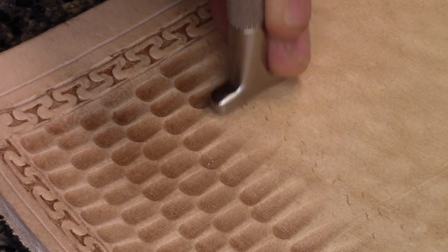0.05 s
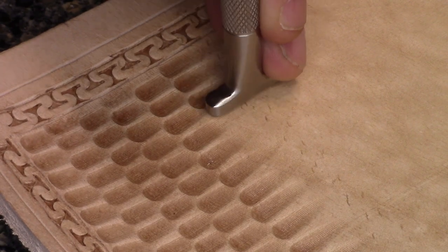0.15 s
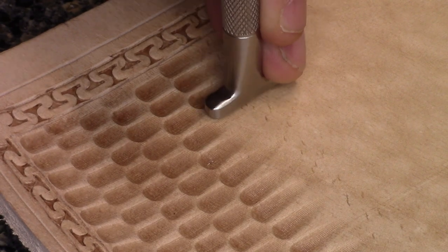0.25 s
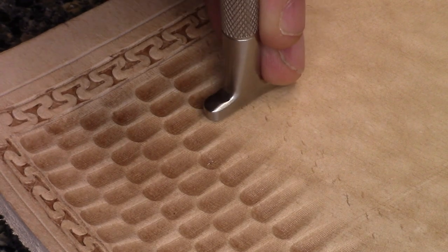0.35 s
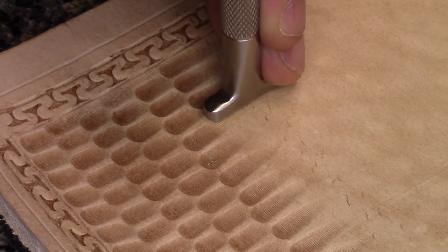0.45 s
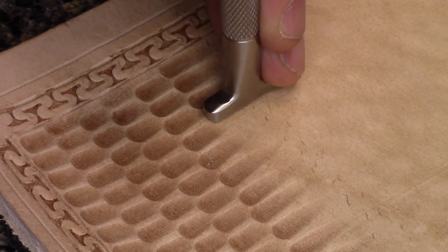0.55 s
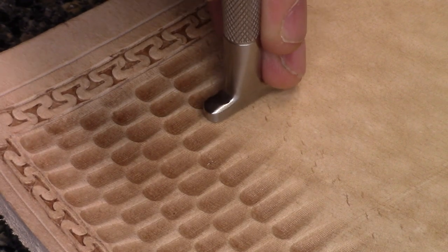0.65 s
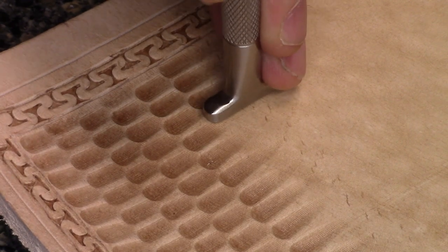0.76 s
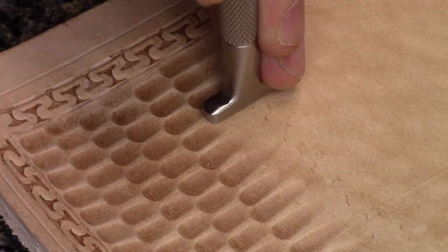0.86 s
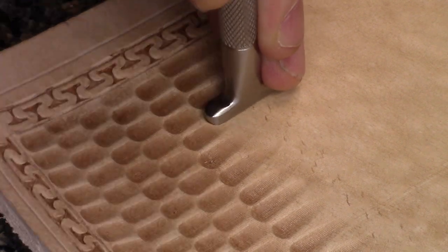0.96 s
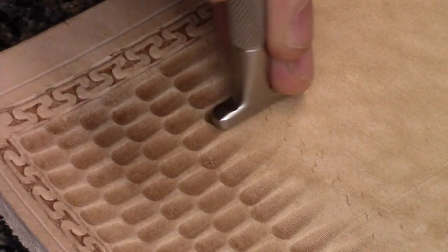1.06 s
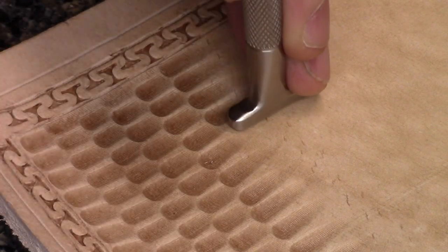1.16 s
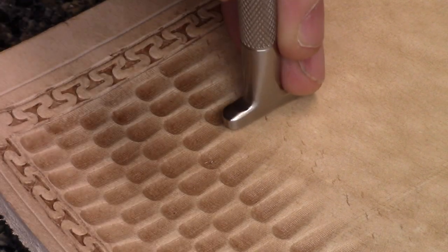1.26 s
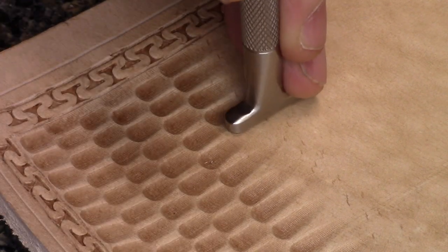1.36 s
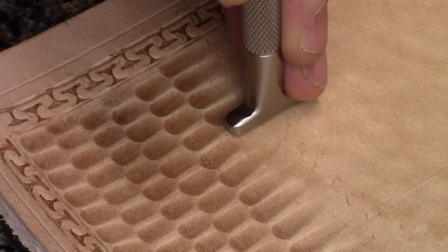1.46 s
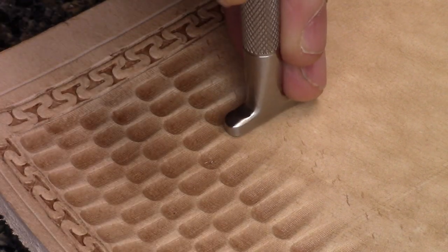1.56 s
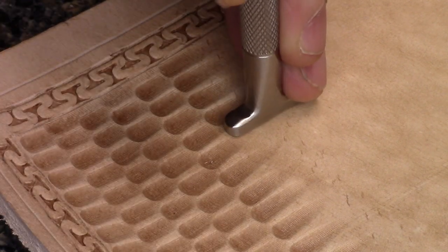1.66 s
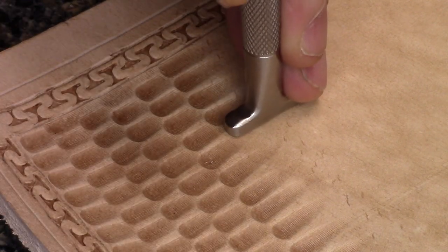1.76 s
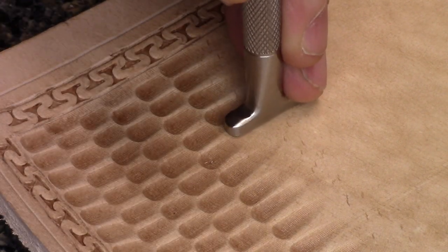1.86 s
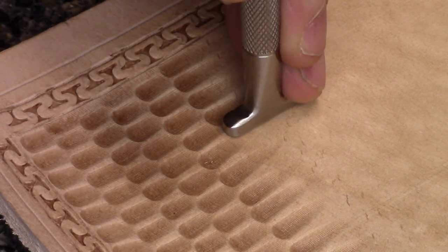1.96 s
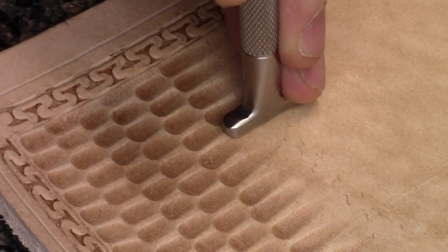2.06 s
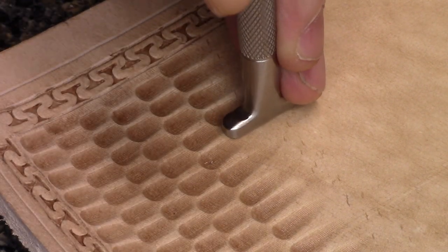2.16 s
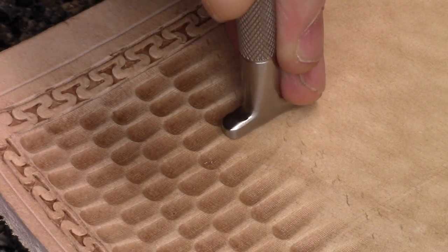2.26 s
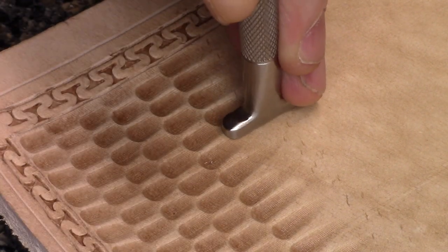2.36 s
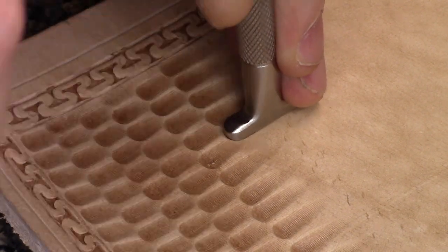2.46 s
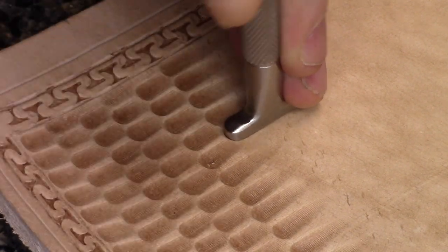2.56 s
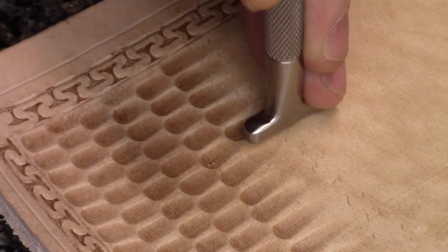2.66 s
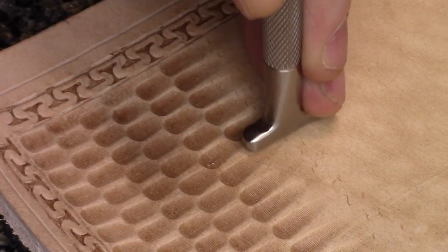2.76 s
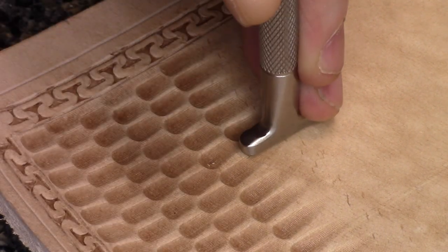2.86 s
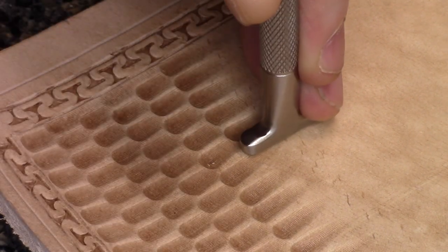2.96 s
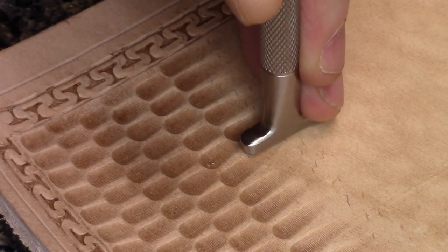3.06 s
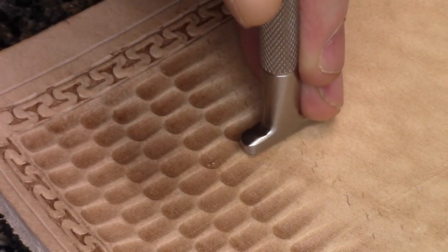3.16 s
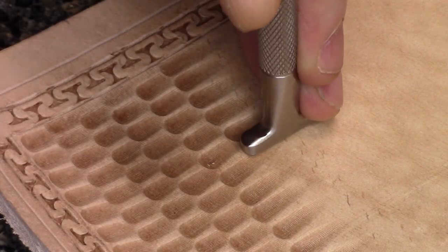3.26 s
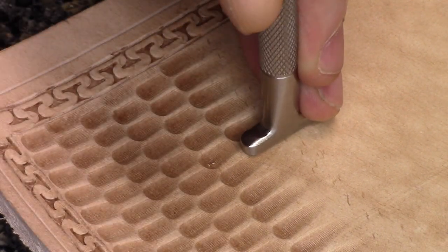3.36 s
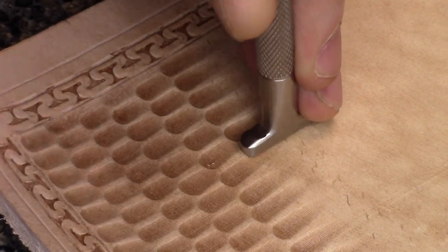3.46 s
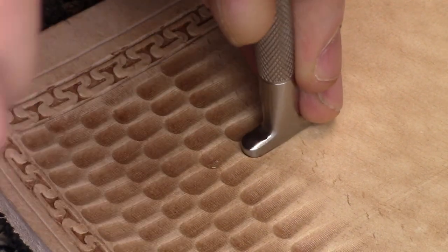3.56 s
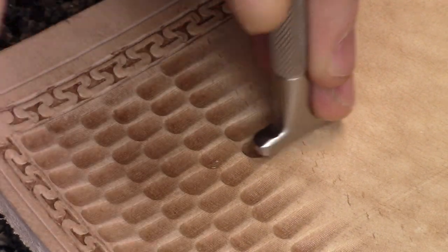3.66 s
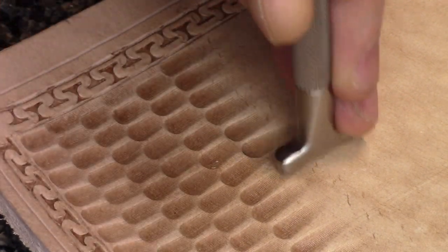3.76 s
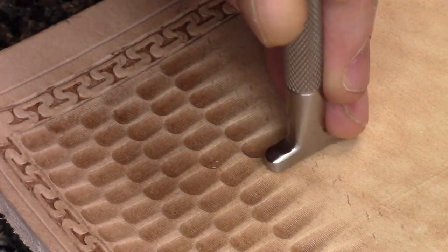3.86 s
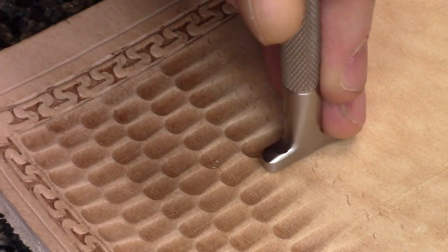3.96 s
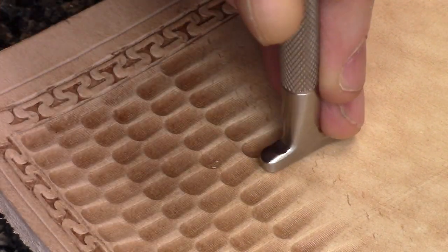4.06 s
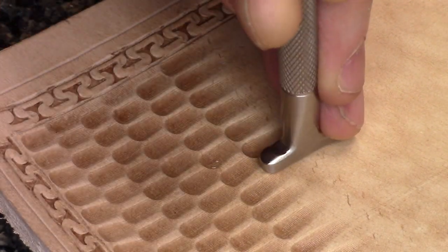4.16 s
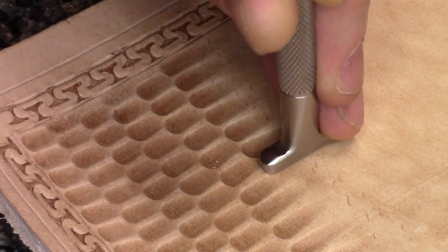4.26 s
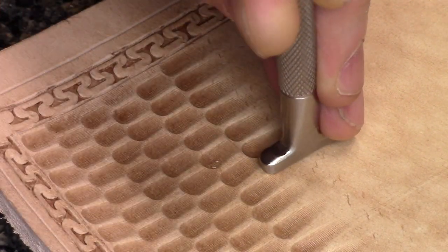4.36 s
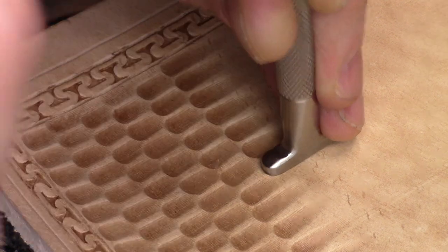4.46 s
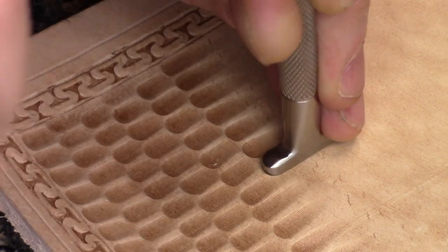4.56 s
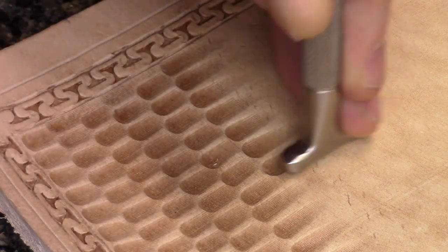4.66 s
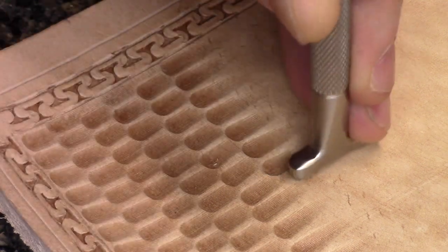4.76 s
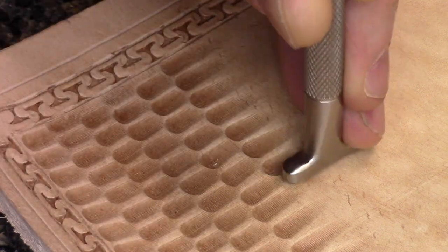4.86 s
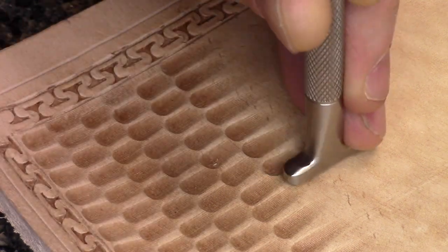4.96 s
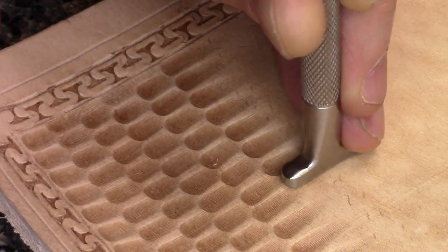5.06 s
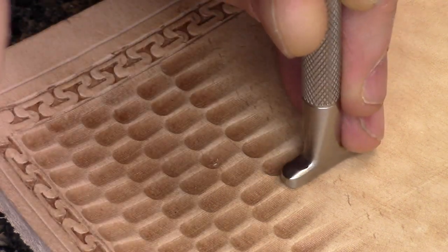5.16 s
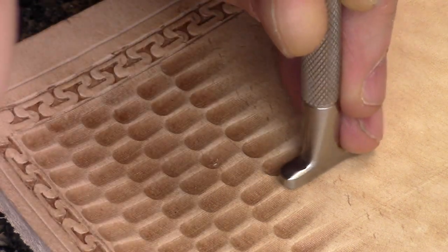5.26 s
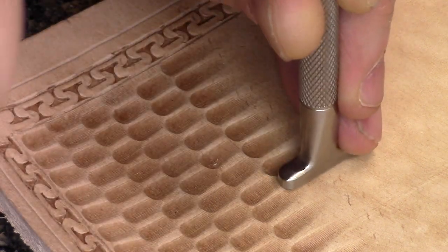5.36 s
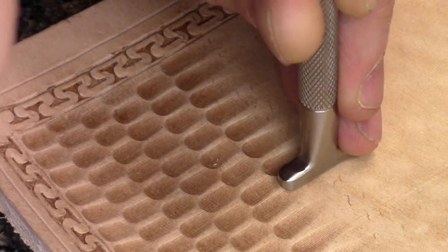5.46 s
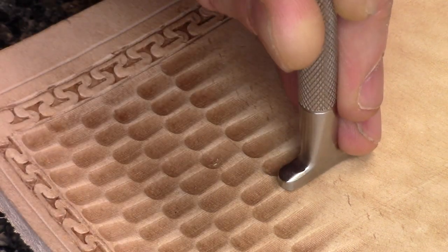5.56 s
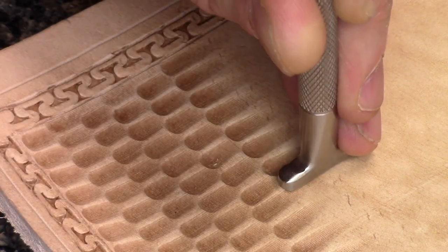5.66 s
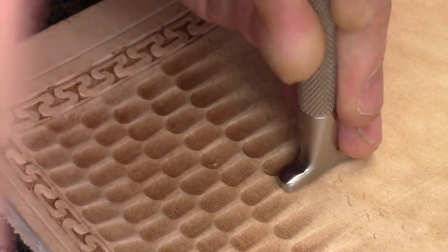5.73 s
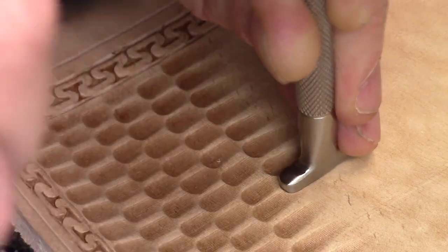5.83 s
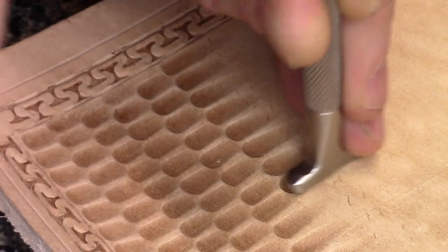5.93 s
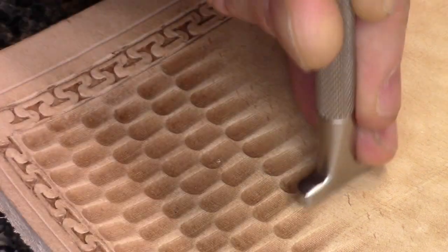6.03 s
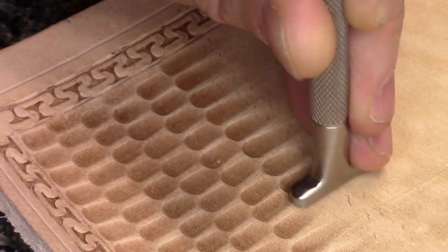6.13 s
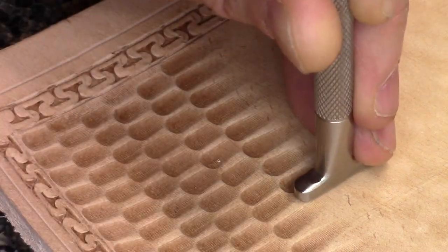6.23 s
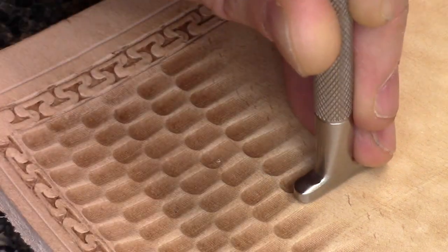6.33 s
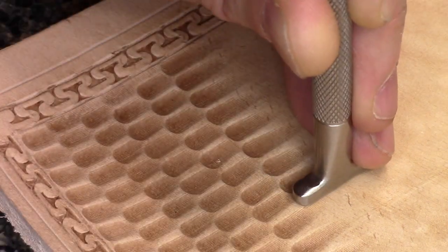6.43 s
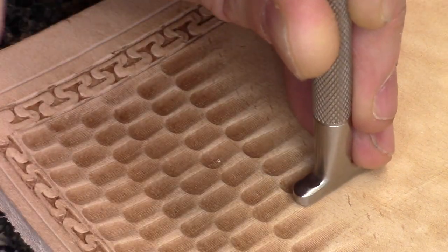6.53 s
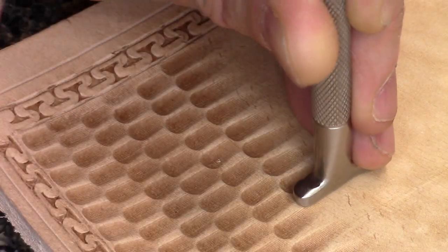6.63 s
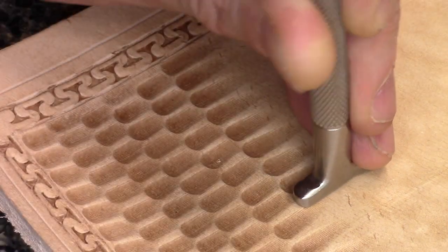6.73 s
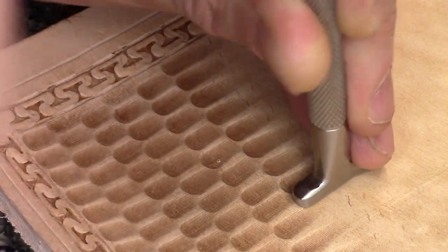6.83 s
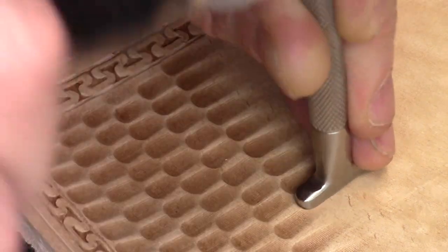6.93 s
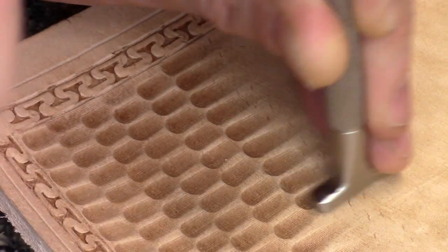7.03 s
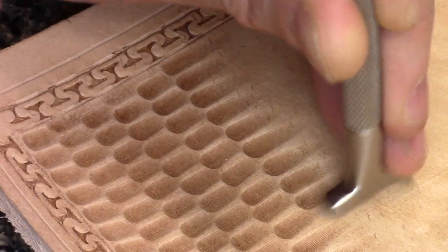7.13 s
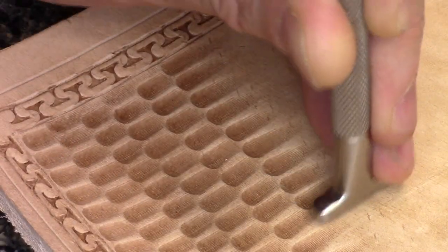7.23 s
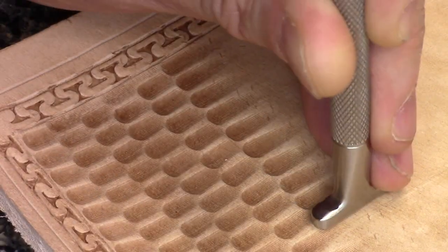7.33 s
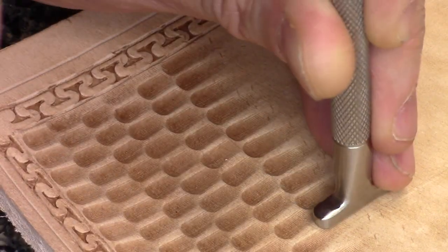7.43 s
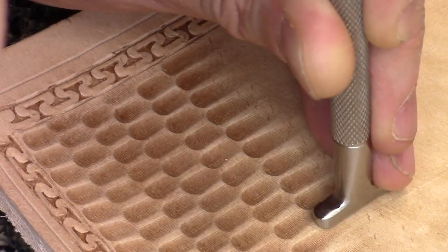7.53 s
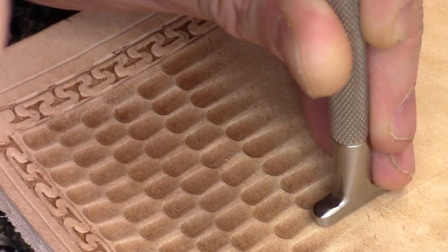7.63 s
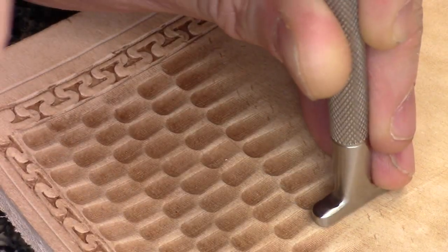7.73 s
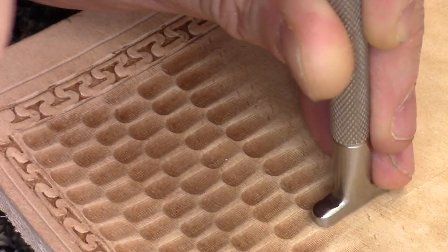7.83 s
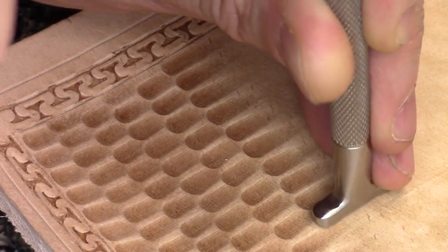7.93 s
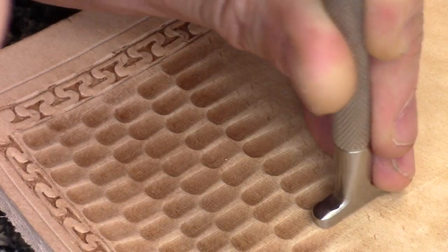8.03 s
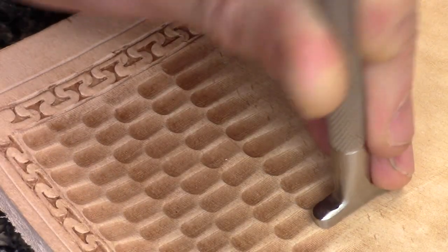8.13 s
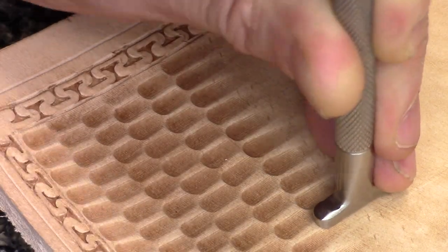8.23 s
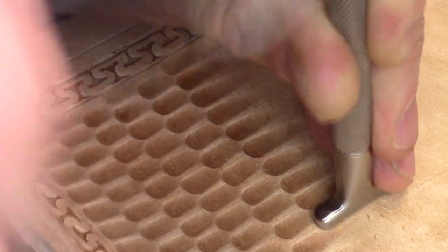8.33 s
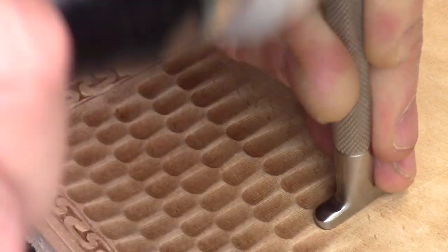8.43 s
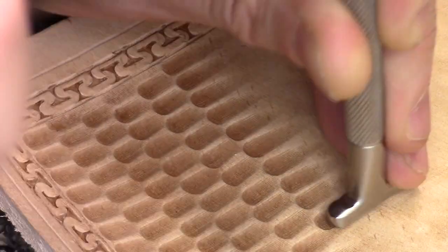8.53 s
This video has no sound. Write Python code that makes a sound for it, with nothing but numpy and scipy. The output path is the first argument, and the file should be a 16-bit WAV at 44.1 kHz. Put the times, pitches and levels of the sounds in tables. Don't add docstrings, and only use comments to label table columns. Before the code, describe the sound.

Single, spaced hammer strikes on a metal leather stamp: sharp steely clack, solid woody-stone thud, quick workshop reverberation, faint room air and hum between.

```python
import sys
import numpy as np
from scipy import signal
from scipy.fft import rfft, irfft
from scipy.io import wavfile
from scipy.ndimage import uniform_filter1d, minimum_filter1d

SR = 44100
rng = np.random.default_rng(int(sys.argv[2]) if len(sys.argv) > 2 else 0)


def gain_from_db(level_db):
    decades = np.asarray(level_db, float) / 20
    return 10 ** decades


def int16_out(signal):
    q = np.round(np.clip(np.atleast_2d(signal).T, -1, 1) * 32767)
    wavfile.write(sys.argv[1], SR, q.astype(np.int16))


N = 378819
LEAD = 8820

# (time [s], thud level [dB], steel ring level [dB], hard edge contact level [dB],
# camera gain after it [dB])
BLOWS = [
    (-.19, 6.5, -2.5, -7, 0),
    (0.869, 12.5, 1, -6.5, -0.5),
    (2.4009, 12.5, 4.5, 6.5, -0.5),
    (3.4569, 13, 5, 8, -3.5),
    (4.4363, 12.5, 0, -12, -8.5),
    (5.721, 14.5, 7, 7, -15.5),
    (6.8352, 13, -4, -15.5, -16.5),
    (8.3156, 13.5, -2.5, -21, -15.5),
]


def evened(x):
    return x / np.sqrt(np.mean(x ** 2) + 1e-20)


def read(points, hz):
    f, value = np.transpose(points)
    return np.interp(np.log(hz + 1), np.log(f + 1), value)


def coloured(x, points):
    hz = np.fft.rfftfreq(len(x), 1 / SR)
    return irfft(rfft(x) * gain_from_db(read(points, hz)), len(x))


def add(mix, s, sound):
    part = mix[round(s * SR) + LEAD:][:len(sound)]
    part += sound[:len(part)]


def ring(modes, t, spread_db=0):
    hz, db, t60 = np.transpose(modes)[:, :, None]
    db = db + spread_db * rng.standard_normal(db.shape)
    return (gain_from_db(db - 60 * t / t60) * np.sin(2 * np.pi * hz * t)).sum(0)


def ports(mid, side):
    return np.array([mid + side, mid - side])


def air():
    # (frequency [Hz], level [dB])
    air_colour = [(25, -32), (40, -20), (55, -8), (85, -9), (120, -5), (200, -2), (260, 0), (400, -4),
                  (700, -10), (1200, -16), (7000, -29), (11400, -34), (15500, -46), (16500, -70)]
    # (frequency [Hz], level [dB])
    air_side = [(60, -13), (110, -6), (200, -20), (380, -9.5), (700, -7), (1290, -7.5), (2380, -5),
                (4400, -18), (8120, -27.5), (15000, -20.5)]
    # (frequency [Hz], level [dB])
    hum_tones = [(59.2, -70), (118.4, -68.5)]
    air_db = -56
    frames, hz = N // 512 + 5, np.fft.rfftfreq(2048, 1 / SR)
    a, b, c, d, patches = rng.standard_normal((frames, 1025, 5)).T
    patches = uniform_filter1d(patches, 24, 0)
    patches = evened(uniform_filter1d(patches, 7, 1))
    z = np.array([a + 1j * b, (c + 1j * d) * gain_from_db(read(air_side, hz)[:, None])])
    z *= gain_from_db(read(air_colour, hz)[:, None] + .8 * patches)
    mid, side = signal.istft(z, nperseg=2048, noverlap=1536)[1][:, :N]
    t = np.arange(N) / SR
    waver = evened(uniform_filter1d(rng.standard_normal(N), 6000))
    hum = sum(gain_from_db(db + 3 + 1.5 * waver) * np.sin(2 * np.pi * f * t) for f, db in hum_tones)
    return gain_from_db(air_db) * ports(mid, side) / mid.std() + hum


def blow(thud_db, shank_db, edge_db):
    # (frequency [Hz], level [dB], time to fall 60 dB [s])
    counter_modes = [(140, -7, 0.09), (191.2, -3, 0.17), (229, -7.5, 0.033), (261.6, -1.5, 0.052),
                     (334, 2.5, 0.14), (410.3, -9.5, 0.074), (434, -5.5, 0.03), (541, -8, 0.041),
                     (643, -8.5, .06), (778, -7.5, 0.067), (888, -13, 0.035), (1015, -13.5, 0.02)]
    # (frequency [Hz], level [dB], time to fall 60 dB [s])
    stamp_modes = [(1676, -7, 0.09), (1890, -6, 0.015), (2312, -4, 0.047), (3092, -5, 0.017)]
    # (frequency [Hz], level [dB], time to fall 60 dB [s])
    edge_modes = [(4775, -8, 0.012), (6520, -13, .01), (7700, -10, 0.0067), (8800, -7.5, 0.0041)]
    # (frequency [Hz], level [dB])
    crack_colour = [(300, -9), (700, -13), (1300, -22.5), (1700, -7), (2400, -6.5), (3000, -15),
                    (3800, -18.5), (5000, -20.5), (8000, -24.5), (12000, -31), (16000, -51.5)]
    t = np.arange(SR // 2) / SR
    onset = np.sin(np.pi / 2 * np.minimum(t / .0006, 1)) ** 2

    shank_hz = 3436 + 24 * shank_db
    shank_modes = [(shank_hz, 0, .017), (shank_hz * 1.07, -5, .025), (shank_hz * .92, -9, .012)]
    shank = -gain_from_db(shank_db) * ring(shank_modes, t) * onset
    edge = gain_from_db(edge_db) * ring(edge_modes, t, spread_db=0.5) * onset

    crack_gain = gain_from_db(.4 * shank_db)
    crack = evened(coloured(rng.standard_normal(len(t)), crack_colour)) * np.exp(-t / .003) * onset
    stamp = ring(stamp_modes, t, spread_db=1.5) * onset

    late = np.maximum(t - .0011, 0)
    knock = ring([(501.9, 1.0, 0.018)], late)
    thud = knock - ring(counter_modes, np.maximum(late - .0009, 0), spread_db=3.5)
    thud = signal.sosfilt(signal.butter(3, 125, "high", fs=SR, output="sos"), thud)
    thud *= gain_from_db(thud_db) / abs(thud).max()
    direct = thud + shank + edge + crack_gain * (gain_from_db(-1.0) * crack + stamp)

    click = coloured(1. * (t == t[150]), crack_colour)
    click *= np.sin(np.pi * np.minimum(t / t[300], 1)) ** 2
    snap = gain_from_db(15.5) * click / np.linalg.norm(click) + gain_from_db(-3.0) * stamp * np.exp(-t / .003)
    bright = gain_from_db(-5.5) * shank + gain_from_db(-9.5) * edge * np.exp(-t / .002) + crack_gain * snap
    shiver = ring([(f, 0, .16) for f in np.linspace(3420, 3995, 12)], t, spread_db=1.5) * onset
    bright = bright + gain_from_db(-35 + 2 * shank_db) * shiver
    push = signal.sosfilt(signal.butter(4, 150, "high", fs=SR, output="sos"), thud * np.exp(-t / .016))
    return direct, bright + gain_from_db(3.5) * push


def tails(count):
    # (frequency [Hz], time to fall 60 dB [s])
    room_decay = [(140, 0.29), (200, 0.34), (400, 0.29), (1000, 0.28), (2500, .27), (3700, 0.31),
                  (6000, 0.3), (12000, 0.27)]
    # (time [s], level [dB])
    wall_echoes = [
        (.0085, 5),
        (0.0267, 4.5),
    ]
    taps = np.zeros((count, SR))
    at = np.arange(150, SR - 10, 10) + rng.integers(0, 10, (count, (SR - 151) // 10))
    np.put_along_axis(taps, at, rng.choice([-1., 1.], at.shape), 1)
    hz, t, z = signal.stft(taps, SR, nperseg=1024)
    fall_db = -60 * t / read(room_decay, hz)[:, None]
    far_db = -25.5 + fall_db / 2.1 - hz[:, None] / 100
    tail = signal.istft(z * (gain_from_db(fall_db) + gain_from_db(far_db)), SR, nperseg=1024)[1][:, :SR * 2 // 3]
    t = np.arange(tail.shape[1]) / SR
    tail = tail * np.minimum(t / 0.0087, 1) / np.linalg.norm(tail[0])
    for s, db in wall_echoes:
        tail = tail * gain_from_db(db * np.exp(-((t - s) / .0015) ** 2))
    return tail


def mallet():
    # (frequency [Hz], level [dB])
    room_side = [(60, -12), (125, -30), (250, -25), (500, -23), (1000, -18), (3000, -19), (8000, -24),
                 (14000, -24)]
    # (frequency [Hz], level [dB])
    tail_side = [(1500, -9.5), (3500, -14.5), (6000, -30)]
    mid, side = np.zeros((2, N + LEAD + 1))
    first, second, apart = tails(count=3)
    apart = coloured(apart, tail_side)
    for k, (s, *levels_db, _) in enumerate(BLOWS):
        direct, burst = blow(*levels_db)
        moved = .5 * k
        room = np.cos(moved) * first + np.sin(moved) * second
        add(mid, s, direct)
        add(mid, s, signal.fftconvolve(burst, room))
        add(side, s, direct)
        add(side, s, signal.fftconvolve(burst, apart))
    return ports(mid, coloured(side, room_side))[:, LEAD:LEAD + N]


def ticks():
    # (time [s], peak level [dB], centre frequency [Hz])
    finger_ticks = [
        (.694, -46.5, 6900),
        (2.248, -58.5, 7940),
        (5.625, -59, 8800),
        (5.667, -59, 3550),
        (6.536, -64, 4930),
        (7.98, -61.5, 5040),
    ]
    mix, t = np.zeros(N + LEAD), np.arange(600) / SR
    for s, db, hz in finger_ticks:
        colour = [(hz * .15, -20), (hz * .4, -5), (hz, 0), (hz * 1.7, -8), (hz * 3, -16)]
        puff = coloured(rng.standard_normal(len(t)), colour)
        lift_db = db - camera_db()[round(s * SR)]
        add(mix, s, gain_from_db(lift_db) * evened(puff) * np.exp(-t / .003))
    return mix[LEAD:]


def whistles():
    # (time [s], length [s], frequency [Hz], peak level [dB])
    thin_whistles = [
        (.895, .1, 12230, -44),
        (2.43, .09, 12230, -47),
        (4.56, .09, 10900, -62),
        (5.87, .1, 9720, -63),
    ]
    mix = np.zeros(N + LEAD)
    for s, length, hz, db in thin_whistles:
        t = np.arange(0, length, 1 / SR)
        add(mix, s, gain_from_db(db) * np.sin(np.pi * t / length) ** 2 * np.sin(2 * np.pi * hz * t))
    return mix[LEAD:] / gain_from_db(camera_db())


def rubs():
    # (time [s], length [s], frequency [Hz], level [dB])
    leather_rubs = [
        (6.3, .53, 2150, -84),
    ]
    mix = np.zeros(N + LEAD)
    for s, length, hz, db in leather_rubs:
        t = np.arange(0, length, 1 / SR)
        colour = [(hz * .9, -40), (hz * .97, 0), (hz * 1.03, 0), (hz * 1.1, -40)]
        band = coloured(rng.standard_normal(len(t)), colour)
        add(mix, s, gain_from_db(db) * evened(band) * np.sqrt(t / length))
    return mix[LEAD:] / gain_from_db(camera_db())


def camera_db():
    creep_below_db, creep_per_s, settle_s = -10.5, .6, .02
    s, after_db = np.transpose(BLOWS)[[0, 4]]
    t = np.arange(N) / SR
    last = np.searchsorted(s, t) - 1
    depth_db = np.maximum(creep_below_db - after_db, 0)[last]
    creep_db = creep_per_s * depth_db * (t - s[last])
    return uniform_filter1d(after_db[last] + creep_db, round(settle_s * SR))


def scene():
    return air() + mallet() + ticks() + whistles() + rubs()


def top_cut(x):
    return signal.sosfilt(signal.butter(12, 16810, fs=SR, output="sos"), x)


def record(dry):
    x = signal.sosfilt(signal.butter(2, 45, "high", fs=SR, output="sos"), dry)
    x = signal.sosfilt(signal.butter(8, 16000, fs=SR, output="sos"), x)
    x = x * gain_from_db(camera_db())
    peak_db = -minimum_filter1d(-20 * np.log10(abs(x).max(0) + 1e-6), size=101)
    fall_db = np.arange(N) * 170. / SR
    held_db = np.maximum.accumulate(peak_db + fall_db) - fall_db
    over_db = np.maximum(held_db + .3, 0)
    x = x / gain_from_db(uniform_filter1d(over_db, size=101))
    return top_cut(x)


dry = scene()
out = record(dry)
int16_out(out)
```